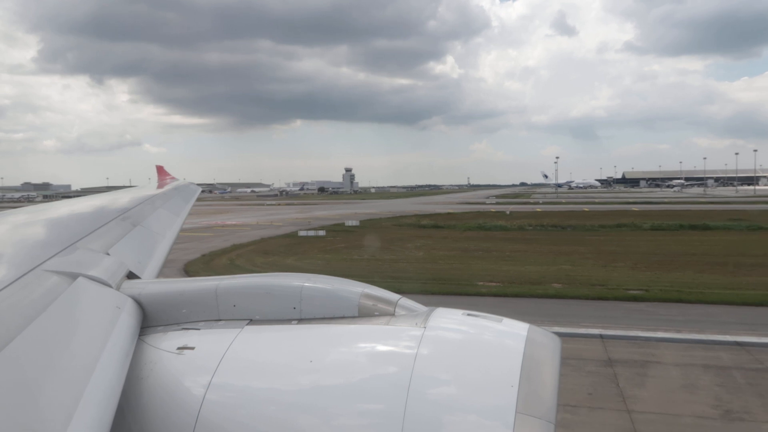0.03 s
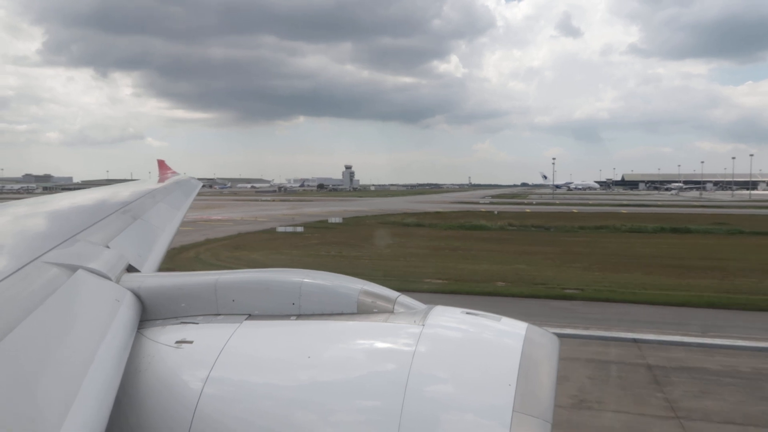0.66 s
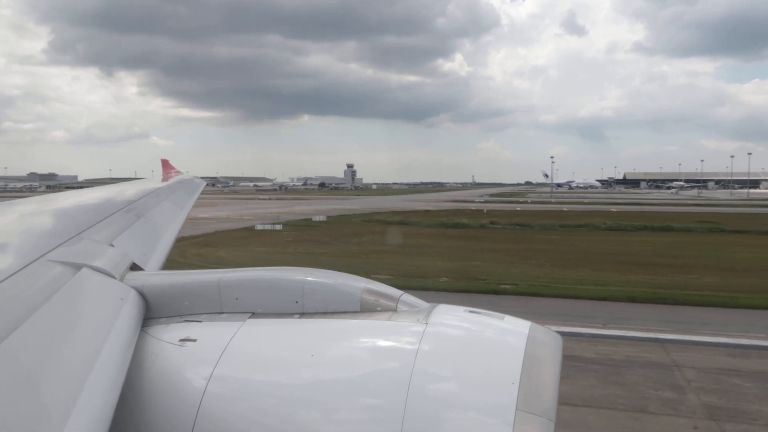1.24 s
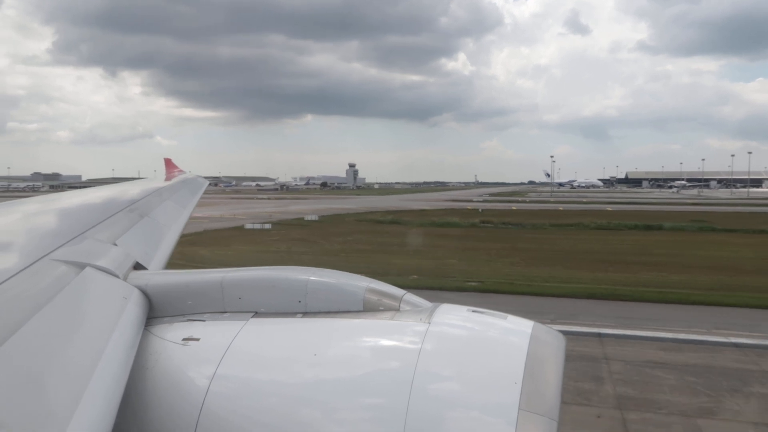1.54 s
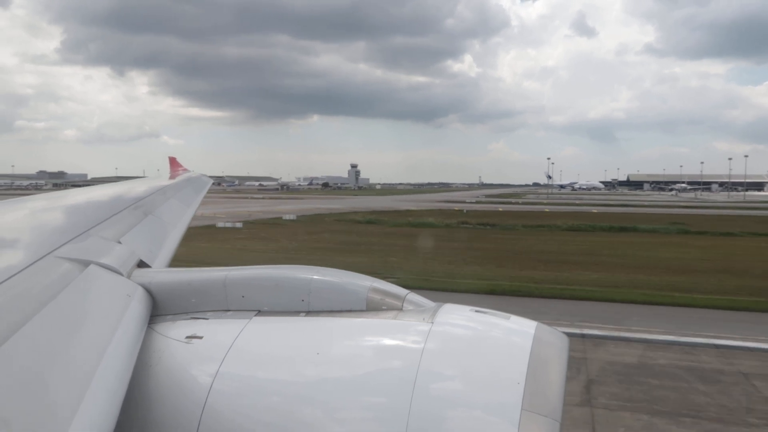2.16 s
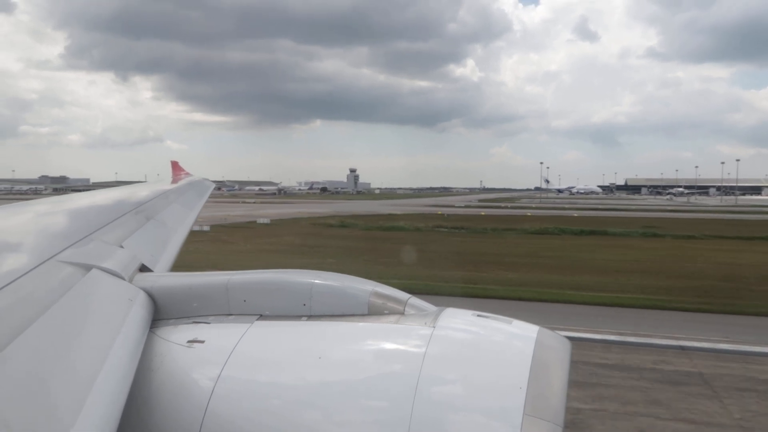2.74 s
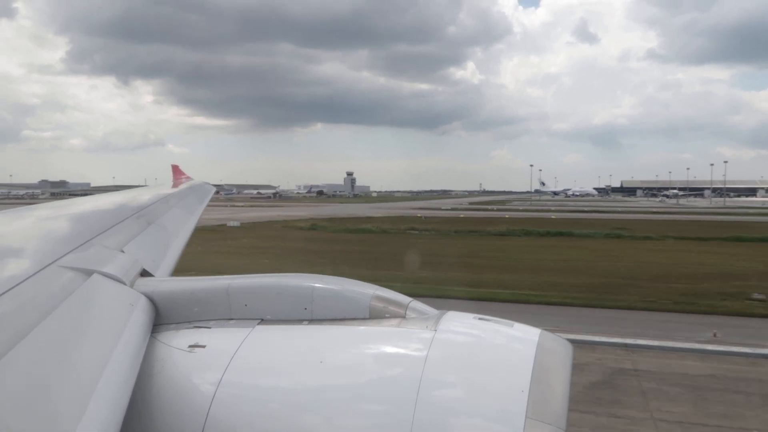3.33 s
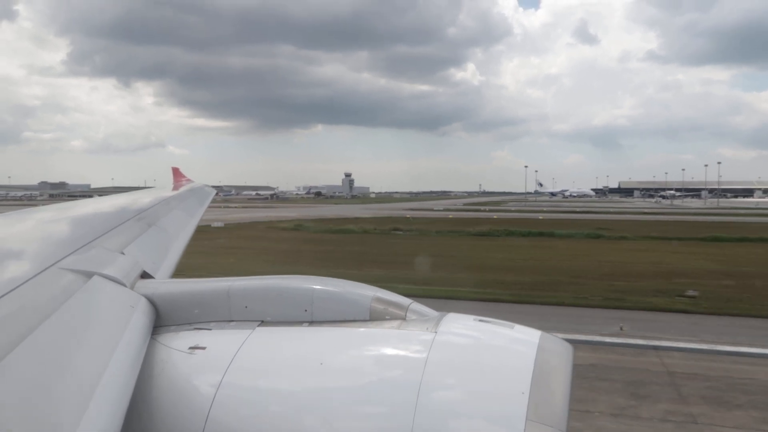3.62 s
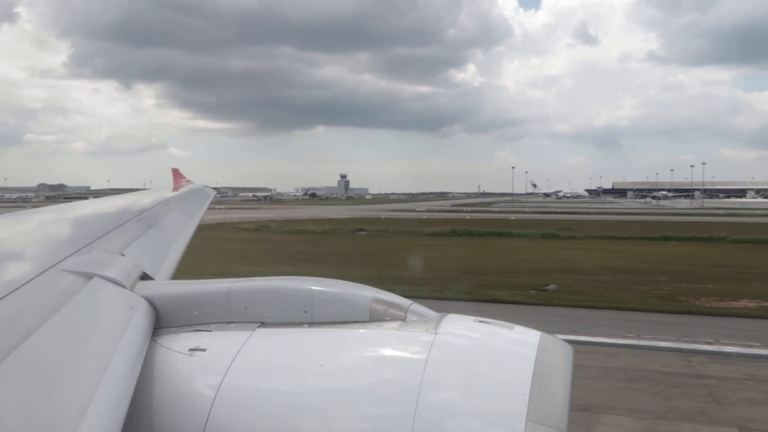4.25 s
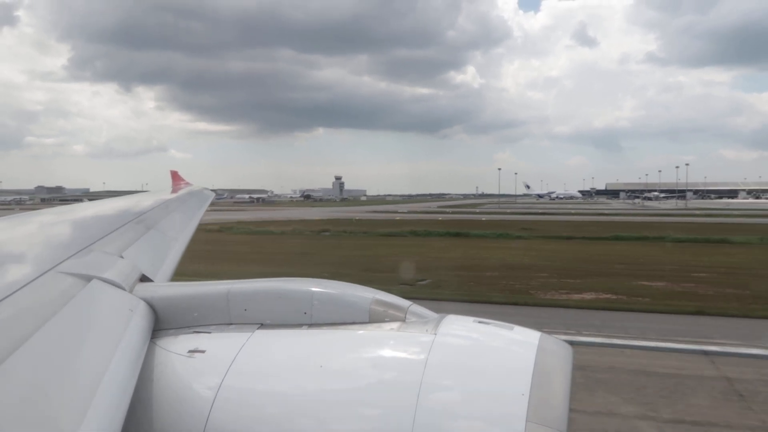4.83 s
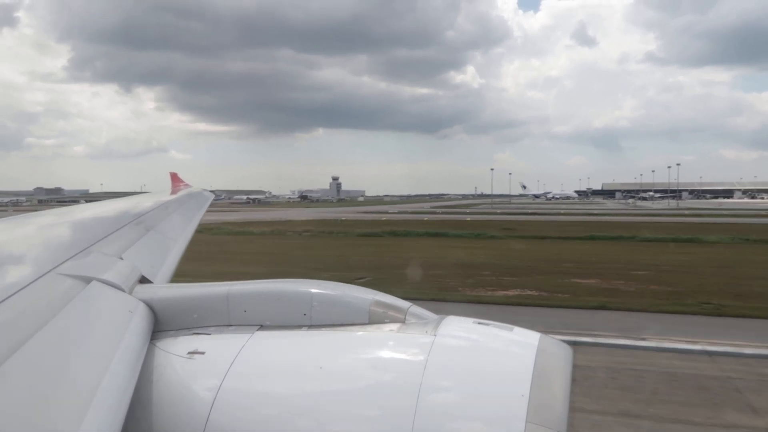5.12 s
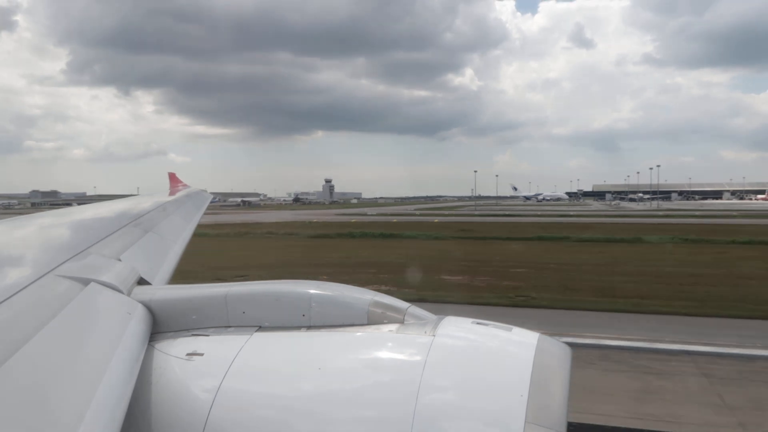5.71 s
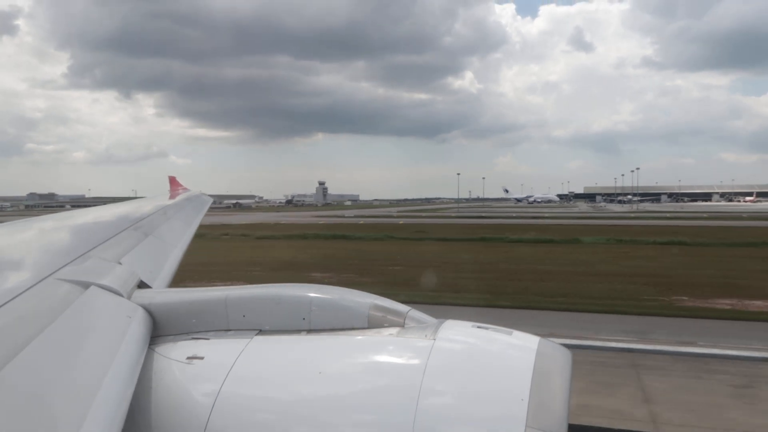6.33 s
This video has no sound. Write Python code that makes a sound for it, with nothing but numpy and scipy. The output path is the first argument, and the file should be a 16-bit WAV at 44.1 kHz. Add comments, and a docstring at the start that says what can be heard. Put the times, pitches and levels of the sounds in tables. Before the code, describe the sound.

Inside a plane starting its take-off run, a loud engine roar and rising whine hold steady over runway rumble, cabin knocks and clicks.

```python
"""Two turbofans finish spooling up and hold thrust, heard in an airliner cabin as the take-off roll begins.
Their exhaust roars through the fuselage, the fan blades whine, the shaft orders buzz and air hisses.
Under them the wheels rumble on the runway, and a cabin resonance booms during the spool-up.
The shaking cabin makes its panels knock and rattle and its plastic fittings click, creak and squeak."""
import sys
import numpy as np
from scipy.fft import rfft, irfft, next_fast_len
from scipy.io import wavfile
from scipy.ndimage import map_coordinates

SR = 44100
rng = np.random.default_rng(int(sys.argv[2]) if len(sys.argv) > 2 else 0)


def master_out(mix):
    """Clip the mix to full scale and print it as 16-bit PCM to the path in sys.argv[1]."""
    frames = np.transpose(np.atleast_2d(mix))
    ceiling = np.clip(frames, -1, 1)
    pcm = np.round(ceiling * 32767).astype(np.int16)
    wavfile.write(sys.argv[1], SR, pcm)


N = 285327
TIME = np.arange(N) / SR

# Fader ride shared by roar, rush and hiss, taken about its average: t/s, level/dB
ENGINE_RIDE = [(0.0, -42.5), (0.34, -43.5), (0.74, -46), (1.22, -46), (1.42, -46), (1.66, -47.5),
               (2.38, -43), (2.61, -47), (2.79, -47.5), (3.3, -43.5), (3.49, -47.5), (3.84, -44.5),
               (4.03, -47.5), (4.47, -48.5), (6.23, -48), (6.47, -46)]
# Tone colours of the low roar, the midrange rush and the top-end hiss: f/Hz, level/dB
ROAR_EQ = [(40, -42.5), (80, -5.5), (112, 2), (165, -3), (215, -6), (245, -10), (272, -15), (320, -16.5),
           (400, -20.5), (470, -27), (700, -44.5), (2000, -100)]
RUSH_EQ = [(150, -32.5), (400, 8.5), (560, 10.5), (740, 5.5), (860, 2.5), (1200, -1.5), (1450, -7.5),
           (1650, -11), (1900, -13.5), (2250, -13.5), (3000, -19), (3300, -36), (6000, -64)]
HISS_EQ = [(1000, -16), (2700, -5.5), (3400, -2.5), (4000, 0), (4750, -2), (5400, -7), (7500, -11),
           (9500, -13), (12000, -19.5), (14000, -32)]
def engine_airflow():
    """Exhaust roar, the rush of the fan stream and air hiss, all dulled by the fuselage."""
    ride_db = swing(ENGINE_RIDE)
    roar = coloured(ROAR_EQ, amp(-17 + 0.98 * ride_db))
    rush = coloured(RUSH_EQ, amp(-40.5 + ride_db + 1.5 * wobble(9.9)))
    hiss = coloured(HISS_EQ, amp(-63 + ride_db + 0.92 * wobble(13)))
    return roar + rush + hiss


START_HZ, PEAK_HZ, HOLD_HZ = 638, 734, 727
SPOOL_S, SPOOL_LAG_S, SETTLE_LAG_S = 2.3, 1.6, 1.1
def fan_speed():
    """Blade-passing rate in Hz: it eases up to a small overshoot, then slowly settles."""
    climb = np.expm1(-TIME / SPOOL_LAG_S) / np.expm1(-SPOOL_S / SPOOL_LAG_S)
    settle = np.exp(-(TIME - SPOOL_S) / SETTLE_LAG_S)
    climbing_hz = START_HZ + (PEAK_HZ - START_HZ) * climb
    settling_hz = HOLD_HZ + (PEAK_HZ - HOLD_HZ) * settle
    return np.where(TIME < SPOOL_S, climbing_hz, settling_hz)


def fans():
    """The engines' pitched layers, all locked to the fan speed."""
    blade_hz = fan_speed()
    turns = np.cumsum(blade_hz) / SR + .017 * wobble(24)  # turbulence makes the phase wander
    thrust = np.clip((blade_hz - 660) / 65, 0, 1)
    return blade_whine(turns, thrust) + shaft_buzz(turns, blade_hz) + core_hum(turns, thrust)


# The blade tone and its octave swell and fade in the cabin: t/s, level/dB
WHINE_RIDE = [(0.0, -22.5), (0.11, -38.5), (0.22, -28.5), (0.35, -28), (0.5, -38), (0.8, -42), (1.0, -42),
              (1.38, -39), (1.48, -50), (1.9, -38.5), (2.42, -36), (2.56, -32.5), (2.8, -41), (3.0, -36.5),
              (3.27, -37), (3.55, -43.5), (3.8, -33.5), (3.95, -36.5), (4.1, -47), (4.5, -50),
              (4.82, -39.5), (5.12, -57), (5.4, -49.5), (6.46, -49)]
OCTAVE_RIDE = [(0.0, -48), (0.4, -46.5), (0.8, -49), (0.95, -56), (1.35, -51), (1.6, -60), (2.4, -48),
               (2.75, -53.5), (3.0, -53), (3.2, -48), (3.5, -51), (3.9, -46.5), (4.08, -58.5), (4.7, -63.5),
               (6.46, -64)]
# Upper partials: multiple of the blade rate, spooling level/dB, full-thrust level/dB
BLADE_PARTIALS = [(3, -68, -66), (4, -73, -72), (5, -88, -80), (6, -90, -79), (7, -76, -86)]
# One partial flares for a moment: multiple of the blade rate, t/s, half length/s, level/dB
PARTIAL_FLARES = [(3, 0.48, .06, -61), (4, 0.14, .11, -65), (6, 6.13, .17, -75)]
def blade_whine(turns, thrust):
    """Passing blades sing a tone, its octave and a sheen; the faster far fan beats against the near."""
    near = blade_tone(turns, scatter=.025, flutter_rate=45)
    far = amp(-23) * blade_tone(1.008 * turns, scatter=.025, flutter_rate=45)
    fundamental = amp(curve(WHINE_RIDE)) * unit(near + far)
    octave = amp(curve(OCTAVE_RIDE)) * blade_tone(2 * turns, scatter=.18, flutter_rate=45)
    follow_db = 0.33 * swing(OCTAVE_RIDE)
    sheen = 0
    for k, spooling_db, full_db in BLADE_PARTIALS:
        level_db = spooling_db + (full_db - spooling_db) * thrust + follow_db + 1.5 * wobble(7)
        flare = swells(row[1:] for row in PARTIAL_FLARES if row[0] == k)
        sheen += (amp(level_db) + flare) * blade_tone(k * turns, scatter=.4, flutter_rate=35)
    return fundamental + octave + sheen


def blade_tone(turns, scatter, flutter_rate):
    """One blade tone: a narrow wavering line on a broad skirt of turbulence."""
    skirt = amp(0.5) * np.sqrt(scatter) * tone(turns, scatter=1, flutter_rate=240)
    return unit(tone(turns, scatter, flutter_rate) + skirt)


# The buzz at held thrust: multiple of the shaft rate, level/dB
SHAFT_ORDERS = [(6, -33), (7, -33.5), (8, -31.5), (9, -39), (10, -44.5), (11, -54)]
# Fader ride on top, opening as the fan nears full speed: t/s, level/dB
BUZZ_RIDE = [(0, -12), (1.2, -9), (1.75, -4.5), (2.2, 2.5), (2.75, -1), (3.25, 1.5), (4.3, 0), (6.0, 0.5),
             (6.46, 2.5)]
def shaft_buzz(turns, blade_hz, blades=20):
    """Unequal blades buzz at multiples of the shaft rate, sweeping through the cabin's resonances."""
    orders, order_db = np.transpose(SHAFT_ORDERS)
    buzz = 0
    for k in orders:
        level_db = np.interp(k * blade_hz / HOLD_HZ, orders, order_db)  # the cabin ties level to pitch
        buzz += amp(level_db) * tone(k * turns / blades, scatter=.14, flutter_rate=8)
    return amp(curve(BUZZ_RIDE)) * buzz


def core_hum(turns, thrust, held_hz=238):
    """The core shaft's hum fades in with thrust."""
    return amp(-36) * thrust * tone(turns * held_hz / HOLD_HZ, scatter=.5, flutter_rate=4)


# Sub-heavy colour of the wheels: f/Hz, level/dB
WHEEL_EQ = [(8, -37), (16, -24.5), (28, -10), (42, 1), (53, -4.5), (64, 2), (78, -9.5), (100, -12.5),
            (160, -47.5), (400, -100)]
# Their fader ride: t/s, level/dB
WHEEL_RIDE = [(0, -17.5), (1.0, -18), (2.1, -17), (3.3, -15.5), (4.6, -17.5), (5.2, -15), (5.7, -16),
              (6.47, -16)]
def wheel_rumble():
    """Wheels rolling over the runway lay down a deep bed."""
    return coloured(WHEEL_EQ, amp(curve(WHEEL_RIDE)))


# Boxy colour of the boom: f/Hz, level/dB
BOOM_EQ = [(80, -69.5), (145, -3), (172, 2), (225, -12), (290, -13.5), (360, -14), (470, -25), (800, -75)]
# Its fader ride: t/s, level/dB
BOOM_RIDE = [(0, -24), (0.58, -20), (0.85, -29), (1.3, -27), (1.6, -42.5), (6.47, -56.5)]
def cabin_boom():
    """A cabin resonance booms while the engines spool up."""
    return coloured(BOOM_EQ, amp(curve(BOOM_RIDE)))


# Panel hits: t/s, clack level/dB, clatter level/dB, body level/dB, spot f/Hz, spot level/dB
PANEL_KNOCKS = [(0.9084, -35, -44.5, -19, 720, -19), (0.916, -48, -56, -30, 3080, -39),
                (0.93, -49, -51, -30, 560, -26), (1.2083, -43, -48.5, -35, 1120, -36),
                (1.2397, -48, -51, -32, 697, -33), (1.471, -52, -62, -38, 4700, -60),
                (2.2596, -36.5, -55, -22, 460, -19), (2.3066, -37, -57, -27, 1270, -28),
                (2.318, -41.5, -62, -30, 330, -22), (2.385, -45, -55, -31, 430, -27),
                (2.4972, -47, -62, -30, 820, -34)]
# Colours of a panel's dry clack and of its edge's bright clatter: f/Hz, level/dB
CLACK_EQ = [(700, -10), (1300, 7.5), (1800, 1), (2500, 1.5), (2850, 0), (3100, 2), (3450, -13), (4600, -9),
            (5200, -22), (7000, -28), (12000, -45), (14000, -60)]
CLATTER_EQ = [(2000, -16), (3200, -2.5), (4000, 3.5), (4700, -0.5), (5300, -8.5), (7000, -12),
              (9000, -17.5), (12000, -26.5), (14000, -48)]
# The panel's hollow body: f/Hz, width/Hz, level/dB
PANEL_MODES = [(430, 110, 0), (616, 100, 1), (735, 90, 1), (820, 130, 1), (1050, 100, -7), (1290, 130, -8),
               (2980, 100, -24.5)]
def panel_knocks():
    """Loose panels knock: clack and clatter over a hollow body and the ring of the struck spot."""
    times, clack_db, clatter_db, body_db, spot_hz, spot_db = np.transpose(PANEL_KNOCKS)
    rattle = unit(amp(2.5 * wobble(320)))

    def struck(dbs, t60):
        """Envelope of the contact's crack and the panel's rattling tail."""
        crack = blows(times, dbs + 1, t60=.035, attack=.0004)
        tail = blows(times, dbs, t60, attack=.0004) * rattle
        return np.hypot(crack, tail)

    clack = coloured(CLACK_EQ, struck(clack_db, t60=.125))
    clatter = coloured(CLATTER_EQ, struck(clatter_db, t60=.16))
    body = ringing(PANEL_MODES, blows(times, body_db, t60=.077, attack=.0003))
    rings = sum(spot_ring(s, db, hz, t60=.11) for s, db, hz in zip(times, spot_db, spot_hz))
    return clack + clatter + body + rings


# Soft hits: t/s, level/dB, f/Hz
PANEL_BUMPS = [(0.973, -25, 656), (1.135, -40, 1300), (1.189, -26, 520), (1.975, -23, 425),
               (2.258, -16, 215), (4.485, -43, 1300), (5.035, -42, 950), (5.606, -39, 1210)]
def panel_bumps():
    """A soft bump stirs only one spot of a panel."""
    return sum(spot_ring(s, db, hz, t60=.17) for s, db, hz in PANEL_BUMPS)


def spot_ring(s, db, hz, t60):
    """The rough, short ring of one spot of a panel."""
    return blows([s], [db], t60, attack=.0037) * tone(hz * TIME, scatter=.95, flutter_rate=300)


# Click cues, before make-up gain: t/s, level/dB
FITTING_CLICKS = [(0.169, -49), (0.334, -57), (1.3806, -50.5), (1.6163, -55), (1.934, -51.5),
                  (2.058, -52.5), (2.172, -52), (2.4672, -38.5), (2.882, -56), (3.0767, -40), (4.7434, -51),
                  (5.4882, -50), (5.884, -54)]
# Brittle colour of the plastic: f/Hz, level/dB
PLASTIC_EQ = [(800, -16), (2400, 5), (3400, -3), (4400, 2.5), (5400, -5), (7400, -1), (7950, 3),
              (8500, -7.5), (11000, -3), (13800, -11), (15500, -31)]
def fitting_clicks(makeup_db=7.5):
    """Shaken plastic fittings give short, bright clicks."""
    times, dbs = np.transpose(FITTING_CLICKS)
    return amp(makeup_db) * coloured(PLASTIC_EQ, blows(times, dbs, t60=.042, attack=.004))


# Creak cues, before each layer's gain: t/s, half length/s, level/dB
TRIM_CREAKS = [(0.415, 0.13, -64.5), (1.146, 0.049, -55.5), (1.261, 0.031, -53), (1.37, 0.028, -52.5),
               (1.94, 0.027, -46), (1.998, 0.033, -59), (2.308, 0.082, -53.5), (6.137, 0.044, -60)]
def trim_creaks():
    """Trim rubs in short, grainy slips that sound the panel and the plastic."""
    slips = swells(TRIM_CREAKS) * unit(amp(2.4 * np.tanh(wobble(200))))
    rub = coloured(CLACK_EQ, amp(-2) * slips)
    edge = coloured(PLASTIC_EQ, amp(-14) * slips)
    body = ringing(PANEL_MODES, amp(12) * slips)
    return rub + edge + body


# Squeak cues: t/s, half length/s, f/Hz at the peak, glide/(Hz/s), level/dB
TRIM_SQUEAKS = [(1.262, 0.02, 4120, -500, -62), (1.35, .02, 4280, 0, -65), (1.968, .03, 4000, -4500, -59.5)]
def trim_squeaks():
    """Where the trim sticks it gives a thin, rough squeak."""
    squeaks = 0
    for s, half, hz, glide, db in TRIM_SQUEAKS:
        turns = hz * (TIME - s) + glide * (TIME - s) ** 2 / 2
        squeaks += amp(db) * swell(s, half) * tone(turns, scatter=.7, flutter_rate=260)
    return squeaks


# Faint rattle cues: t/s, half length/s, level/dB
EDGE_RATTLES = [(1.222, .014, -51), (3.875, .018, -61), (5.88, .05, -68), (6.13, .09, -64)]
def edge_rattles():
    """A loose edge chatters lightly in tiny, irregular contacts."""
    chatter = unit(amp(6 * np.tanh(wobble(110))))
    return coloured(CLATTER_EQ, swells(EDGE_RATTLES) * chatter)


# Stereo width of every noise layer: f/Hz, side level/dB relative to mid
STEREO_WIDTH = [(30, -74), (85, -62.5), (170, -36), (340, -33), (700, -21.5), (1400, -13), (2800, -9.5),
                (4800, -3.5), (6500, -1), (9000, 5), (13000, 8)]
def noise(gain, drive):
    """Stereo noise of rms drive, shaped by gain: mono in the bass, wide in the treble."""
    def response(hz):
        width = amp(along(STEREO_WIDTH, hz))
        shape = gain(hz)
        rms = np.sqrt(np.mean(np.abs(shape) ** 2) * (1 + width ** 2))
        return shape / rms * np.array([np.ones_like(width), width])
    mid, side = filtered(drive * rng.standard_normal((2, N)), response)
    return np.array([mid + side, mid - side])


def coloured(eq, drive):
    """Noise whose colour comes from eq and whose level comes from drive."""
    return noise(lambda hz: amp(along(eq, hz)), drive)


def ringing(modes, drive):
    """Resonances of alternating polarity stirred by noise, rolled off above 3500 Hz."""
    def response(hz):
        peaks = sum((-1) ** k * amp(db) * 1j * hz * width / (centre ** 2 - hz ** 2 + 1j * hz * width)
                    for k, (centre, width, db) in enumerate(modes))
        return peaks / (1 + (hz / 3500) ** 4)
    return noise(response, drive)


def tone(turns, scatter, flutter_rate):
    """A tone of rms 1 with the share scatter of its power spread into a fluttering skirt."""
    skirt = unit(wobble(flutter_rate) + 1j * wobble(flutter_rate))
    carrier = np.exp(2j * np.pi * (turns + rng.random()))
    return unit(np.real((np.sqrt(1 - scatter) + np.sqrt(scatter) * skirt) * carrier))


def blows(times, dbs, t60, attack):
    """Joint envelope of hits that rise fast and fall 60 dB in t60 seconds."""
    power = np.zeros(N + SR)
    t = np.arange(SR // 2) / SR
    for s, db in zip(times, dbs):
        envelope = amp(db - 60 * t / t60) * (1 - np.exp(-t / attack))
        power[round(s * SR):][:len(t)] += envelope ** 2
    return np.sqrt(power[:N])


def swell(s, half):
    """A smooth rise and fall around time s."""
    return np.exp(-((TIME - s) / half) ** 2 / 2)


def swells(cues):
    """Joint envelope of one swell per cue."""
    return sum(amp(db) * swell(s, half) for s, half, db in cues)


def curve(ride):
    """A fader ride in dB, one value per sample."""
    return np.interp(TIME, *np.transpose(ride))


def swing(ride):
    """A fader ride in dB about its own average."""
    db = curve(ride)
    return db - db.mean()


def wobble(rate):
    """A smooth random curve with rate knots a second."""
    return map_coordinates(rng.standard_normal(int(N * rate / SR) + 4), [TIME * rate])


def along(points, hz):
    """An EQ curve read on a log frequency axis."""
    f, db = np.transpose(points)
    return np.interp(np.log(hz + 1), np.log(f + 1), db)


def filtered(x, response):
    """x through a frequency response."""
    size = next_fast_len(N + SR // 2)
    return irfft(rfft(x, size) * response(np.fft.rfftfreq(size, 1 / SR)), size)[..., :N]


def amp(db):
    """Decibels to gain."""
    return 10 ** (np.asarray(db) / 20)


def unit(x):
    """x at rms 1."""
    return x / np.sqrt(np.mean(x ** 2) + 1e-20)


def scene():
    """The mix from a window seat."""
    bed = wheel_rumble() + cabin_boom()
    engines = engine_airflow() + fans()
    panels = panel_knocks() + panel_bumps()
    fittings = fitting_clicks() + trim_creaks() + trim_squeaks()
    return engines + bed + panels + fittings + edge_rattles()


def record(dry, ceiling=.8, fade_s=.004, top_hz=15000):
    """Master chain: soft-clip the highest peaks, ease in and out, cut the very top."""
    rounded = dry / (1 + np.abs(dry / ceiling) ** 6) ** (1 / 6)
    ease = np.interp(TIME, [0, fade_s, N / SR - fade_s, N / SR], [0, 1, 1, 0])
    return filtered(rounded * np.sin(np.pi / 2 * ease) ** 2, lambda hz: hz < top_hz)


dry = scene()
out = record(dry)
master_out(out)
```